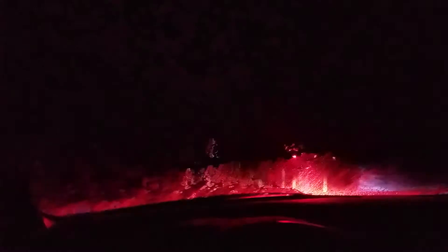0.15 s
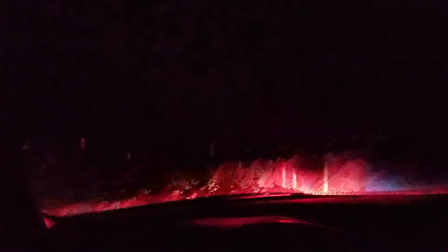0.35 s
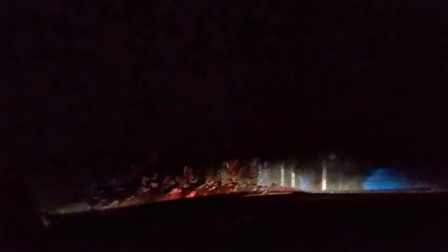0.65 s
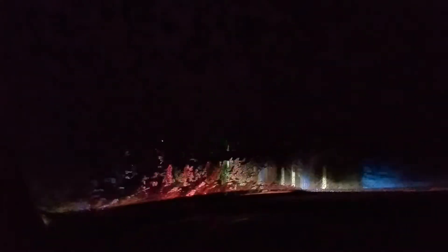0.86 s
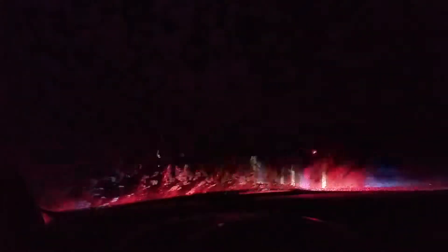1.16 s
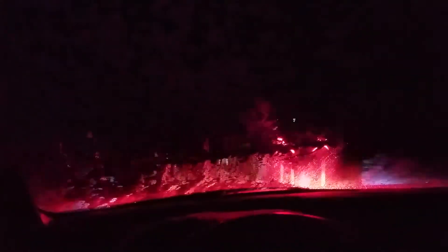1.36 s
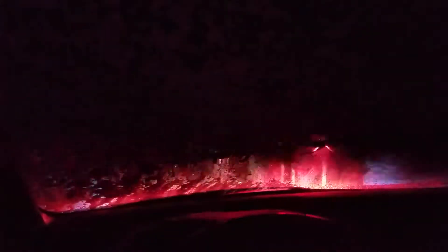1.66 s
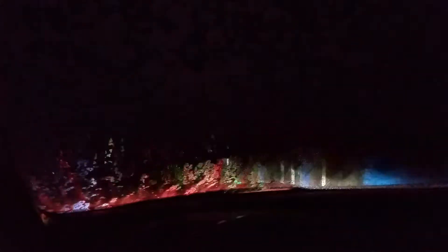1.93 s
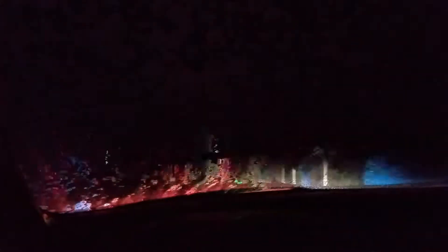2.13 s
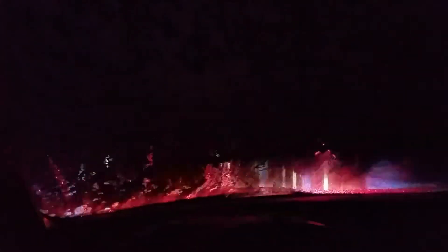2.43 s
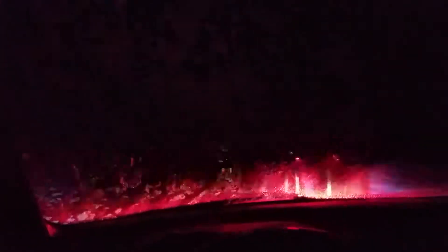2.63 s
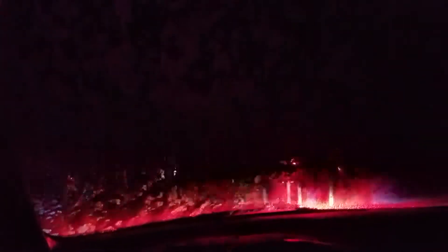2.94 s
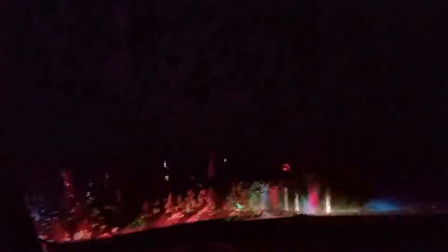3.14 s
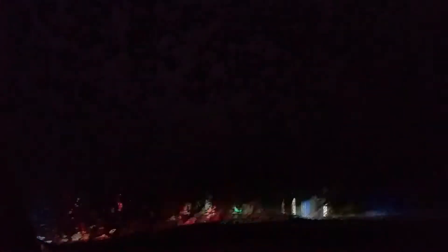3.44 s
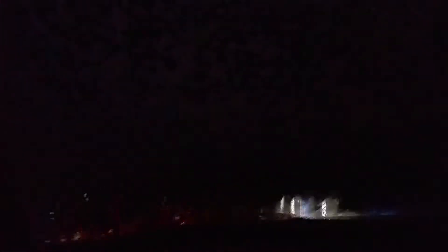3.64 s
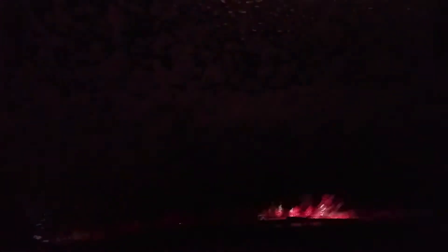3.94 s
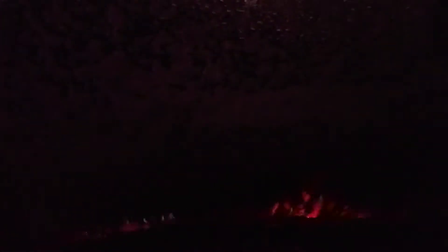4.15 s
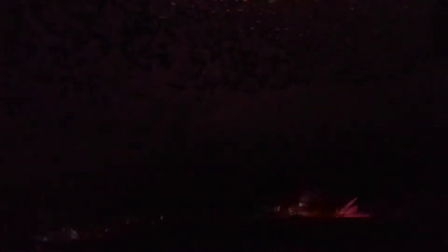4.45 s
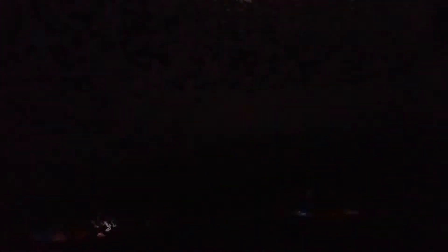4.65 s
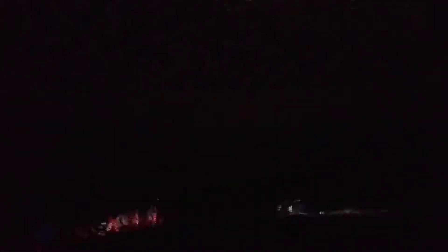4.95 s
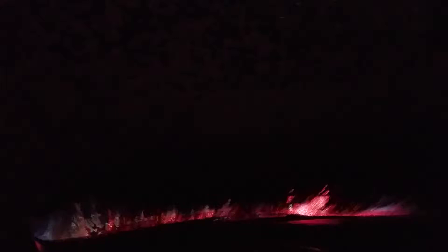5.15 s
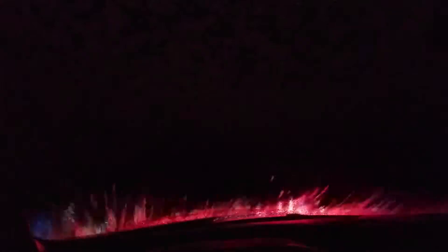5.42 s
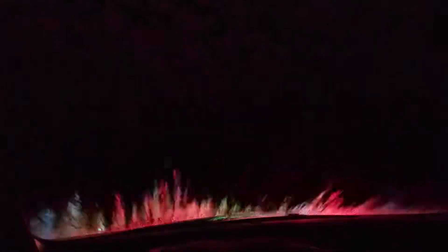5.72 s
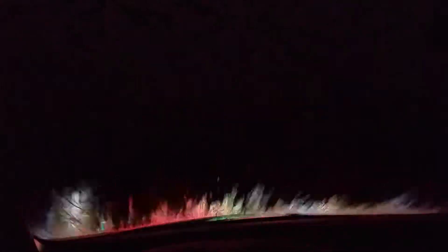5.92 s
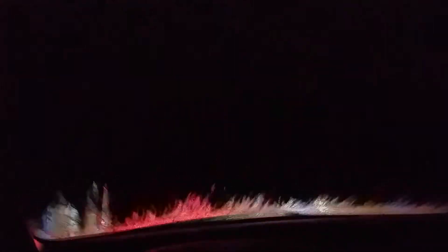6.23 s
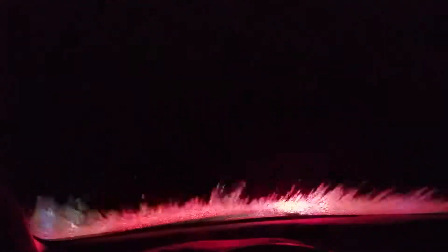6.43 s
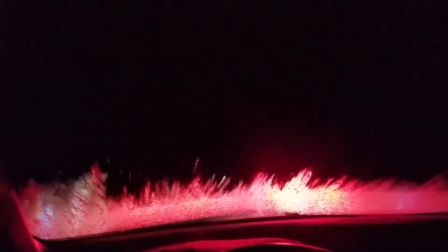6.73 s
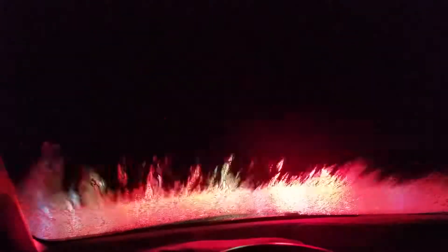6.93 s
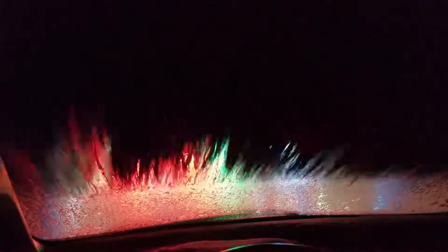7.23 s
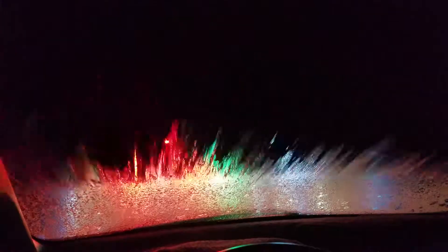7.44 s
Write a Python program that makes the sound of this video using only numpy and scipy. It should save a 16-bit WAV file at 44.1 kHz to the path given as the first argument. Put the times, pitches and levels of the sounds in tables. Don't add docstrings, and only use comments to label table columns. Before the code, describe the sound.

Muffled wash machinery hums and ticks for three seconds, then a heavy cloth brush booms over the car with wet swishes, slaps and water patter.

```python
import sys
import numpy as np
from scipy import signal
from scipy.io import wavfile

SR = 44100
rng = np.random.default_rng(int(sys.argv[2]) if len(sys.argv) > 2 else 0)


def natural_amplitude(level_db):
    exponent = np.asarray(level_db, float) / 20
    return 10 ** exponent


def pcm_store(signal):
    levels = np.round(np.clip(np.atleast_2d(signal), -1, 1) * 32767)
    wavfile.write(sys.argv[1], SR, levels.astype(np.int16).T)


N = 334278
STEP = 32
MEAN_WET_DB = -47

# start_s, level_db
WETNESS = [(0, -55.5), (.5, -60.5), (3.1, -58.5), (3.4, -52), (3.62, -50), (4.0, -48.5), (4.2, -48),
           (4.65, -47.5), (5.2, -45), (5.55, -39.5), (5.85, -46), (6.05, -45.5), (6.3, -46.5), (6.7, -44),
           (7.15, -45.5), (7.3, -47), (7.45, -45), (7.58, -49)]
# pitch_hz, level_db_per_hz
SWISH_SPECTRUM = [(1650, -21), (2800, -6), (3010, -20.5), (3720, -1.5), (4700, -5.5), (5340, 1),
                  (6680, 0.5), (9000, -30.5), (11700, -53), (19800, -120)]
# pitch_hz, level_db_per_hz
SPRAY_SPECTRUM = [(4410, -22.5), (7500, 9), (9220, -25), (11400, -0.5), (13000, -7), (15100, -1),
                  (16000, -8)]


def amp_of_power(db_list):
    return np.sqrt(sum(natural_amplitude(db) ** 2 for db in db_list))


def rms_one(x):
    return x / np.sqrt(np.mean(x ** 2) + 1e-20)


def slow_time():
    return np.arange(N // STEP + 2) * STEP / SR


def follow(rows):
    s, level_db = np.transpose(rows)
    return np.interp(slow_time(), s, level_db)


def every_sample(curve):
    return np.interp(np.arange(N) / STEP, np.arange(len(curve)), curve)


def at_hz(points, hz):
    table_hz, value = np.transpose(points)
    return np.interp(np.log(hz), np.log(table_hz), value)


def drift(rate_hz):
    r = np.exp(-2 * np.pi * rate_hz * STEP / SR)
    white = rng.standard_normal(N // STEP + 2002)
    return rms_one(signal.lfilter([1], [1, -2 * r, r * r], white)[2000:])


def band(x, low_hz, high_hz):
    return signal.sosfilt(signal.butter(2, [low_hz, high_hz], "band", fs=SR, output="sos"), x)


def resonance(x, hz, width_hz):
    r = np.exp(-np.pi * width_hz / SR)
    top = np.array([1, 0, -1]) * (1 - r * r) / 2
    return signal.lfilter(top, [1, -2 * r * np.cos(2 * np.pi * hz / SR), r * r], x)


def bursts(times_s, level_db, pan_db, low_hz, high_hz, fall_s, echo_db):
    t, out = np.arange(round(.06 * SR)) / SR, np.zeros((2, N + SR))
    shape = np.exp(-t / fall_s) + natural_amplitude(echo_db) * np.exp(-t / 0.0088)
    white = rng.standard_normal((len(times_s), 3, len(t)))
    alike = .4
    ears = alike * white[:, 2:] + np.sqrt(1 - alike ** 2) * white[:, :2]
    noise = band(ears * shape, low_hz, high_hz)
    noise /= np.sqrt(np.sum(noise ** 2, axis=2, keepdims=True) / (fall_s * SR))
    for s, db, pan, puff in zip(times_s, level_db, pan_db, noise):
        at = round(s * SR)
        out[:, at:at + len(t)] += natural_amplitude(db + pan / 2 * np.array([[1], [-1]])) * puff
    return out[:, :N]


def drone():
    # pitch_hz, level_db_per_hz
    spectrum = [(15, -50), (25, -22.5), (149, 2), (185, -29.5), (229, -9.5), (285, -0.5), (317, -10),
                (405, -12), (516, -8.5), (659, -25.5), (796, -27.5), (936, -40.5), (2160, -35.5),
                (9070, -62), (16000, -63)]
    return spectrum, np.full(len(slow_time()), -24.5)


def hums():
    # pitch_hz, width_hz, level_db
    hum_rows = [
        (241.05, 4, -31.5),
        (277, 7.6, -39),
        (782, 18, -49),
        (150, 8, -34.5),
    ]
    out = 0
    for hz, width_hz, db in hum_rows:
        once = resonance(rng.standard_normal(N + SR), hz, width_hz)
        out = out + natural_amplitude(db) * rms_one(resonance(once, hz, width_hz)[SR:])
    return out


def pump():
    # start_s, level_db
    load = [(0, -30), (.5, -34), (.9, -36), (1.1, -32), (1.75, -30), (1.92, -40), (2.3, -29), (2.48, -39),
            (3.0, -29), (3.13, -38), (3.32, -26), (3.52, -39), (3.75, -30), (4.2, -35), (4.45, -31),
            (4.95, -30), (5.3, -37), (7.58, -36)]
    whine_hz, wander_hz, rough_share, flutter_db = 516.5, 1.4, .3, .8
    pitch_hz = whine_hz + wander_hz * every_sample(drift(5.07))
    tone = np.sqrt(2) * np.sin(2 * np.pi * np.cumsum(pitch_hz) / SR)
    rough = rms_one(resonance(rng.standard_normal(N), whine_hz, 8.2))
    gain = natural_amplitude(every_sample(follow(load) + .8 + flutter_db * drift(6.4)))
    return (tone + rough_share * rough) * gain * natural_amplitude(np.array([[.3], [-.3]]))


def knocks():
    # start_s, level_db (peak), pitch_hz, fall_s, width as share of pitch
    knock_rows = [
        (0.059, -32, 1820, .007, .05),
        (0.060, -44, 2400, 0.0041, .15),
        (0.061, -49, 3400, 0.0056, 0.18),
        (0.060, -46, 5200, 0.0065, 0.19),
        (0.173, -52, 7000, .002, .2),
        (0.307, -42, 7200, .0015, .3),
        (2.141, -48, 8400, 0.0033, .08),
        (7.231, -34, 3400, .003, .2),
    ]
    return sum(bursts([s], [db], [0], (1 - wide) * hz, (1 + wide) * hz, fall_s, -24)
               for s, db, hz, fall_s, wide in knock_rows)


def spurts():
    # start_s, hold_s, level_db
    spurt_rows = [
        (-.02, 0.035, -51),
        (0.056, .07, -53.5),
        (0.197, 0.14, -54),
        (.33, .15, -61),
    ]
    t, rise_db_per_s, fall_db_per_s = slow_time(), 700, 350
    levels_db = []
    for s, hold_s, db in spurt_rows:
        early_db = rise_db_per_s * np.clip(s - t, 0, .2)
        late_db = fall_db_per_s * np.clip(t - s - hold_s, 0, .3)
        levels_db.append(db - early_db - late_db)
    return np.max(levels_db, axis=0)


def links():
    # first_tick_db, second_tick_db
    link_wear = [(-41, -50), (-46, -42), (-42, -42), (-47, -43.5), (-54, -48), (-57, -41), (-49, -52),
                 (-56, -43)]
    first_s, period_s, pair_s, low_db = .1950, .4461, .1085, -2.5
    starts_s = np.arange(first_s, N / SR - pair_s, period_s)
    pan_db = 2.5 * rng.standard_normal((len(starts_s), 2))
    return [(s + k * pair_s, link_wear[i % len(link_wear)][k], low_db, pan_db[i, k])
            for i, s in enumerate(starts_s) for k in range(2)]


def ticks():
    # start_s, level_db (peak), low_part_db, pan_db
    drops = [(0.0223, -36, -7, -3.5), (0.2254, -46, -2, 12), (2.8988, -45.5, 0.5, 3),
             (3.4256, -37, -20, 2.5), (3.457, -43.5, 0, 1), (3.4685, -45, -9, -0.5), (3.5862, -40, 3, 2.5),
             (3.715, -39, -5, -3), (3.931, -43.5, 0, -5.5), (4.309, -42, -7, 2), (4.3629, -36, -7.5, 4),
             (4.407, -40, -1, -2), (4.6149, -36.5, -4, 1.5), (4.7441, -44.5, 0.5, 8), (4.815, -42, -1, 5),
             (5.0399, -43, 0, 2), (5.1612, -32, 1, 0), (5.361, -34, 3, -0.5), (5.3797, -31, 3, 4.5),
             (5.4031, -34.5, 1, 4), (5.4845, -33, 5, -7), (5.6331, -38.5, -2, -10), (5.9449, -36, 0, 6),
             (6.4915, -28, 3, 1), (6.6863, -38, 2, 5.5), (6.7897, -24, -1, 1), (6.9217, -35.5, -5.5, -3.5),
             (7.229, -29, 2, -1), (7.4051, -33, 3, 1.0), (7.5448, -33.5, 4, 4)]
    # start_s, level_db (peak), low_part_db,
    # pan_db
    fine_ticks = [(3.3363, -42, -6, 0.5), (3.5369, -40, -6, 1.5), (3.6581, -43, -6, 0.0),
                  (3.9524, -42, -6, 1.5), (4.121, -36, -6, 0.5), (4.4907, -36, -6, -1.0),
                  (4.6922, -40, -6, 0.5), (4.9018, -40, -6, 1.0), (5.0948, -39, -6, 0.0),
                  (5.2555, -38, -4, 0.5), (5.5463, -34, -6, 1.0), (5.7702, -40, -6, 0.5),
                  (5.8336, -41, -6, 0.5), (5.9254, -37, -6, 0.5), (5.9948, -40, -6, 0.5), (6.096, -41, -6, 2.0),
                  (6.4373, -43, -6, 0.0), (7.1606, -42, -6, 1.5)]
    s, peak_db, low_db, pan_db = np.transpose(links() + list(drops) + list(fine_ticks))
    crack = bursts(s, peak_db - 2.6, pan_db, 10400, 15800, 0.00087, -14.0)
    snap = bursts(s, peak_db - 10, pan_db, 4000, 17000, 0.0003, -44.5)
    low = bursts(s, peak_db + low_db - 1.8, pan_db, 5000, 8600, 0.0018, -18.0)
    return snap + crack + low


def tips():
    rate_per_s, tip_db, spread_db = 200, -42, 4.0
    t = np.arange(N) / SR
    wet_db = np.interp(t, *np.transpose(WETNESS)) - MEAN_WET_DB
    born = rng.random(N) < rate_per_s / SR * np.interp(t, (3.2, 3.5), [0, 1])
    size_db = tip_db + wet_db + spread_db * np.minimum(rng.exponential(1, N), 4)
    side_db = 3.0 * rng.standard_normal(N) * [[1], [-1]]
    clicks = born * rng.choice([-1, 1], (2, N)) * natural_amplitude(size_db + side_db) + 1e-18
    return band(clicks, 10300, 17000) + natural_amplitude(-3.0) * band(clicks, 4200, 8000)


def flicks():
    # start_s, level_db (peak), pitch_hz, pan_db
    flick_rows = [(3.5832, -32, 3270, 1.0), (3.7528, -33, 3270, 0.5), (3.8905, -31, 3930, 2.0),
                  (3.9299, -32, 3610, 3.0), (4.091, -33, 3740, 1.5), (4.1599, -34, 3030, 1.0),
                  (4.3923, -33, 3460, 1.5), (4.4831, -39, 3000, 5.5), (4.4831, -31, 3820, 2.0),
                  (4.5769, -33, 3730, 2.5), (4.6912, -34, 3670, 2.5), (4.7301, -33, 3100, 1.5),
                  (4.748, -32, 3220, 1.0), (4.8149, -31, 3730, 1.0), (4.8618, -31, 3730, 2.0),
                  (4.9027, -29, 3220, 1.5), (5.0484, -34, 3590, 1.5), (5.0938, -33, 3800, 2.5),
                  (5.1606, -29, 3110, 2.0), (5.2549, -32, 4030, 0.5), (5.3791, -24, 3190, 3.0),
                  (5.4524, -28, 3600, 3.0), (5.4839, -27, 3590, 0.5), (5.5677, -26, 3230, 2.0),
                  (5.6395, -28, 3500, 2.0), (5.7787, -27, 3000, 0.5), (5.9907, -32, 3530, 1.0),
                  (6.0955, -30, 3130, 1.5), (6.1903, -28, 3660, 1.0), (6.4277, -35, 3690, 2.0),
                  (6.4382, -33, 3280, 1.5), (6.4906, -24, 6590, 2.0), (6.5544, -33, 6360, 1.5),
                  (6.731, -29, 5770, 2.5), (6.7889, -22, 6550, 1.0), (7.2299, -23, 3680, 0.5),
                  (7.4045, -28, 3610, 1.0), (7.4574, -28, 4390, 1.5), (7.5437, -31, 5320, 2.5),
                  (7.5577, -26, 3430, 3.0)]
    fall_s, wide, trim_db = .002, .25, -8.5
    return sum(bursts([s], [db + trim_db], [pan], (1 - wide) * hz, (1 + wide) * hz, fall_s, -20.0)
               for s, db, hz, pan in flick_rows)


def slaps():
    # start_s, level_db (peak), pan_db
    slap_rows = [(0.0624, -36, 4), (1.0829, -39, 6), (2.2343, -49, 3), (3.5817, -18, 2), (3.612, -30, -7),
                 (3.8755, -22, 1), (3.929, -17, -1), (3.9899, -39, 2.5), (4.3944, -21, 5),
                 (4.4558, -32, -1), (4.6643, -34, -2), (4.816, -23, -9), (4.8612, -18, 0), (4.902, -18, -6),
                 (5.078, -28, 2), (5.138, -47, -1), (5.1606, -22, -4), (5.381, -21, 2.5), (6.186, -21, 2),
                 (6.79, -18, -4), (6.9746, -28, 12), (7.2313, -18, -3), (7.2885, -36, -0.5),
                 (7.3347, -38, 16), (7.403, -24, -3), (7.557, -17.5, 2.5)]
    s, peak_db, pan_db = np.transpose(slap_rows)
    return bursts(s, peak_db - 14.0, pan_db, 1300, 4200, 0.0044, -15.0)


def thumps():
    # start_s, level_db (peak), pitch_hz
    thump_rows = [(0.082, -22, 118), (0.62, -20, 150), (0.75, -20, 160), (0.825, -23, 97), (1.952, -25, 78),
                  (2.12, -24, 85), (2.6, -22, 129), (3.139, -21, 112), (3.518, -16, 87), (3.668, -13, 100),
                  (3.84, -14, 102.3), (4.42, -17, 65), (4.62, -16, 85), (4.68, -18, 200), (4.782, -14, 89),
                  (5.1, -17, 70), (5.56, -14, 105), (5.66, -15, 115), (5.67, -19, 62), (6.2, -15, 125),
                  (6.36, -14, 88), (6.553, -15, 120), (6.9, -17, 205), (7.05, -17, 145), (7.13, -19, 75),
                  (7.24, -17, 205), (7.5, -18, 195), (3.45, -22, 45), (3.6, -16, 105), (3.75, -14, 100),
                  (3.76, -21, 47), (4.0, -17, 140), (4.05, -21, 45), (4.3, -21, 48), (4.92, -18, 72),
                  (4.98, -17, 128), (5.08, -19, 235), (5.22, -16, 100), (5.38, -19, 240), (5.7, -19, 208),
                  (5.83, -16, 125), (6.0, -17, 100), (6.1, -22, 47), (6.12, -19, 270), (6.95, -21, 55),
                  (7.4, -21, 70), (6.3, -18, 230), (6.44, -15, 85), (6.6, -16, 205), (6.75, -19, 200)]
    rise_s, fall_s, trim_db = .02, .05, -1.2
    t, out = np.arange(SR // 3) / SR, np.zeros(N + SR)
    shape = (1 - np.exp(-t / rise_s)) * np.exp(-t / fall_s)
    shape /= shape.max()
    for s, db, hz in thump_rows:
        at = round(s * SR)
        out[at:at + len(t)] += natural_amplitude(db + trim_db) * shape * np.sin(2 * np.pi * hz * t)
    return out[:N]


def strands(per_s, spread_db, fall_s, depth):
    draw = rng.random(N // STEP + 2)
    sizes = natural_amplitude(spread_db * np.minimum(rng.exponential(1, len(draw)), 4))
    r = np.exp(-STEP / SR / fall_s)
    smear = signal.lfilter([1], [1, -r], sizes * (draw < per_s * STEP / SR))
    return 10 * np.log10(1 - depth + depth * smear / smear.mean())


def landing_ease():
    return np.interp(slow_time(), (5.8, 6.3), [1.1, .55])


def flaps():
    # start_s, lift_db
    flap_rows = [(3.5, 3), (3.576, 5), (3.63, 3), (3.69, 3), (3.76, 5), (3.885, 6), (4.04, 2), (4.19, 5),
                 (4.39, 0), (4.8, 4), (4.86, 9), (5.03, -2), (5.15, -6), (5.37, -2.5), (5.48, 3),
                 (5.63, 2.5), (6.09, 7), (6.18, 0), (6.72, 3.5), (7.23, 2.5), (7.43, 4)]
    rise_s, fall_s = 0.0049, 0.018
    start_s, lift_db = np.array(flap_rows).T[:, :, None]
    late_s = np.maximum(slow_time() - start_s, 0)
    return 1.2 * np.sum(lift_db * (1 - np.exp(-late_s / rise_s)) * np.exp(-late_s / fall_s), axis=0)


def lulls():
    # centre_s, length_s, depth_db
    lull_rows = [(3.51, 0.022, -3), (3.445, .012, -4), (3.82, .015, -2), (4.01, .015, -2), (4.433, .02, -4),
                 (4.553, .03, -3), (4.73, .02, -3), (5.03, .015, -2), (5.472, .008, -3), (5.624, .012, -7),
                 (6.07, .02, -5)]
    s, length_s, db = np.array(lull_rows).T[:, :, None]
    return np.sum(db * np.exp(-((slow_time() - s) / length_s) ** 2), axis=0)


def answer(law, over_s, weight_db, wet_db):
    idle_db, contact_db, by_weight, by_wet, over_db, come_s, go_s = law
    touch_db = contact_db + by_weight * (weight_db + 18) + by_wet * (wet_db - MEAN_WET_DB)
    coming = np.maximum((over_s[0] - slow_time()) / come_s, 0)
    going = np.maximum((slow_time() - over_s[1]) / go_s, 0)
    swell_db = np.maximum(over_db - 6 * (coming + going) ** 2, -150)
    return 20 * np.log10(amp_of_power([idle_db, touch_db, swell_db]))


def boom(weight_db):
    # pitch_hz, level_db_per_hz
    spectrum = [(15, -47), (25, -15), (55, -4.5), (86, 3), (119, 1), (173, -10.5), (200, 5), (260, -23.5),
                (440, -120)]
    return spectrum, weight_db - .6


def drum(weight_db, wet_db):
    # pitch_hz, level_db_per_hz
    spectrum = [(71, -32), (120, 2.5), (172, -4.5), (232, -1), (270, -17.5), (308, -9.5), (383, -8),
                (560, -22.5), (730, -47), (1230, -120)]
    # idle_db, contact_db, weight_share, wet_share, overhead_db, come_s, go_s
    law = (-24, -24.5, 0, 0.8, -19, 1.4, 0.4)
    return spectrum, answer(law, (5.87, 6.8), weight_db, wet_db) + 0.54 * drift(2.4)


def roof(weight_db, wet_db):
    # pitch_hz, level_db_per_hz
    spectrum = [(140, -34), (180, 2), (205, -2.5), (235, -7), (300, -31)]
    # idle_db, contact_db, weight_share, wet_share, overhead_db, come_s, go_s
    law = (-41.5, -42, 0.2, 0.9, -21, 1.5, 0.5)
    return spectrum, answer(law, (7.6, 7.4), weight_db, wet_db)


def roar(weight_db, wet_db, landing_db):
    # pitch_hz, level_db_per_hz
    spectrum = [(260, -36), (440, 1), (528, -3.5), (638, -5), (775, 1), (900, -5.5), (1000, -13),
                (1150, -9), (1330, -9.5), (1500, -18), (1800, -20), (2340, -54.5), (3960, -120)]
    # idle_db, contact_db, weight_share, wet_share, overhead_db, come_s, go_s
    law = (-36.5, -33, 0.3, 0.4, -25.5, 1.02, 0.49)
    level_db = answer(law, (6.18, 6.1), weight_db, wet_db)
    return spectrum, level_db + 0.79 * drift(11.0) + 0.089 * landing_db


def scrub(weight_db, wet_db, landing_db, bristle_db, flap_db):
    # pitch_hz, level_db_per_hz
    spectrum = [(680, -34.5), (1150, -3.5), (1230, -1.5), (1480, -5), (2030, 0), (2600, -8), (3050, -14),
                (4200, -10), (5460, -41), (9240, -120)]
    # idle_db, contact_db, weight_share, wet_share, overhead_db, come_s, go_s
    law = (-49.5, -39.5, 0, 0.93, -39.5, 0.27, 0.04)
    level_db = answer(law, (3.76, 6.05), weight_db, wet_db) + .3
    strokes_db = .25 * landing_db + .55 * bristle_db + .85 * flap_db
    return spectrum, level_db + strokes_db + 0.12 * drift(18)


def swish(wet_db, landing_db, bristle_db, flap_db):
    strokes_db = 0.89 * flap_db + .3 * bristle_db + .45 * landing_db
    return SWISH_SPECTRUM, wet_db - .7 + .6 * lulls() + strokes_db


def spray(weight_db, wet_db, landing_db, flap_db):
    # idle_db, contact_db, weight_share, wet_share, overhead_db, come_s, go_s
    law = (-82.5, -57.5, 0.2, 1.53, -63.5, 0, 2.5)
    level_db = answer(law, (3.45, 4.6), weight_db, wet_db) + 7.4
    grains_db = strands(160, 5.0, .0012, 0.3) * landing_ease()
    return SPRAY_SPECTRUM, level_db + 1.3 * lulls() + .4 * flap_db + 0.7 * landing_db + grains_db


def crest():
    # pitch_hz, level_db_per_hz
    spectrum = [(560, -20), (680, -2), (800, 0), (900, -2), (1000, -10), (1250, -8), (1450, -20)]
    # start_s, level_db
    crest_level = [(5.2, -60), (5.5, -38), (5.95, -35), (6.15, -32), (6.3, -34), (6.42, -46), (6.7, -70)]
    return spectrum, follow(crest_level) + 1.5 * drift(14)


def mist():
    # pitch_hz, level_db_per_hz
    spectrum = [(5500, -20), (7500, -3), (9000, 0), (10500, -2.5), (12500, -20)]
    return spectrum, -58 + np.interp(slow_time(), (6.1, 6.5), [-30, 0])


def layers():
    # start_s, level_db
    weight = [(0, -33), (.1, -26), (.3, -38), (.78, -24), (1.05, -32), (3.0, -34), (3.34, -21), (3.57, -15),
              (3.8, -15), (4.1, -18.5), (4.55, -17), (4.8, -17), (5.25, -17), (5.42, -20.5), (5.7, -18),
              (6.4, -14.5), (7.05, -22), (7.58, -27.5)]
    weight_db, wet_db, spurt_db = follow(weight), follow(WETNESS), spurts()
    landing_db = strands(80, 3.2, 0.003, 0.58) * landing_ease()
    flap_db, bristle_db = flaps(), strands(45, 3.5, .005, .45)
    return [drone(), (SPRAY_SPECTRUM, spurt_db), (SWISH_SPECTRUM, spurt_db - 12),
            boom(weight_db), drum(weight_db, wet_db), roof(weight_db, wet_db),
            roar(weight_db, wet_db, landing_db), crest(), mist(),
            scrub(weight_db, wet_db, landing_db, bristle_db, flap_db),
            swish(wet_db, landing_db, bristle_db, flap_db),
            spray(weight_db, wet_db, landing_db, flap_db)]


def shares(spectrum, hz):
    inside = (hz >= spectrum[0][0]) & (hz <= spectrum[-1][0])
    level_db = np.where(inside, at_hz(spectrum, hz) + 10 * np.log10(hz), -200)
    return level_db - 10 * np.log10(np.sum(natural_amplitude(level_db) ** 2))


def cabin(x):
    # pitch_hz, width_hz, lift_db
    cabin_modes = [(47.7, 7.8, 5.5), (63.6, 7.2, -10.5), (82, 4.5, 3.5), (140, 42, 2), (232, 22, 2.5),
                   (265.7, 5.9, 2.5), (531, 71, 6), (517, 16, -5), (812, 130, 6), (1140, 61, 3.5)]
    for hz, width_hz, lift_db in cabin_modes:
        x = x + (natural_amplitude(lift_db) - 1) * resonance(x, hz, width_hz)
    return x


def wash():
    # pitch_hz, side_minus_mid_db
    side_width = [(20, -29.5), (45, -29), (60, -14.5), (110, -26.0), (200, -14.5), (380, -5.0), (700, -5.5),
                  (1290, 3), (2380, -2), (4400, 2.0), (8120, -0.5), (15000, 1.0)]
    # pitch_hz, left_minus_right_db
    balance = [(60, 1), (110, -1), (200, 1), (380, -1.5), (700, -1), (1290, 5), (2380, 0), (4400, 2.5),
               (8120, 0), (15000, 1)]
    # pitch_hz, share
    sidelong = [(400, .05), (700, .2), (1100, 0.34), (1700, 0.27), (2500, .25), (4000, .15), (8000, .1)]
    edges_hz = 25 * 2 ** (np.arange(29) / 3)
    centres_hz = np.sqrt(edges_hz[:-1] * edges_hz[1:])
    gains = amp_of_power([shares(spectrum, centres_hz)[:, None] + db for spectrum, db in layers()])
    white, out = rng.standard_normal((2, 2, N + SR // 2)), 0
    for k, hz in enumerate(centres_hz):
        low_hz, high_hz = edges_hz[k], edges_hz[k + 1]
        mid, side = band(white[k % 2], low_hz, high_hz)[:, -N:] * np.sqrt(SR / 2 / (high_hz - low_hz))
        late = at_hz(sidelong, hz)
        side = np.sqrt(1 - late ** 2) * side + late * np.roll(mid, round(SR / hz / 4))
        gain = every_sample(gains[k] * natural_amplitude(0.39 * drift(10.5)))
        ear_gain = natural_amplitude(at_hz(balance, hz) / 2 * np.array([[1], [-1]]))
        out = out + gain * ear_gain * (mid + natural_amplitude(at_hz(side_width, hz)) * side * [[1], [-1]])
    return cabin(0.9 * out)


def scene():
    background = hums() + pump() + knocks()
    contacts = ticks() + tips() + flicks() + slaps() + thumps()
    return background + contacts + wash()


def low_pass(x):
    return signal.sosfilt(signal.butter(12, 15850, fs=SR, output="sos"), x)


def record(dry):
    x = dry + (natural_amplitude(-8.5) - 1) * resonance(dry, 8420, 4500)
    x = x + (natural_amplitude(-1.2) - 1) * resonance(x, 9900, 1500)
    x = signal.sosfilt(signal.butter(3, 40.5, "high", fs=SR, output="sos"), x)
    x = 0.82 * np.tanh(x / 0.83)
    x = signal.sosfilt(signal.ellip(10, .3, 60, 15850, fs=SR, output="sos"), x)
    return low_pass(x)


dry = scene()
out = record(dry)
pcm_store(out)
```